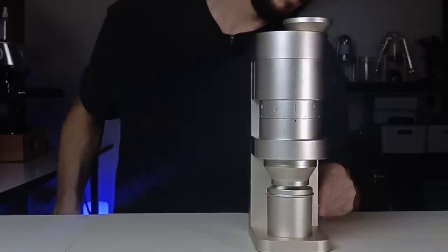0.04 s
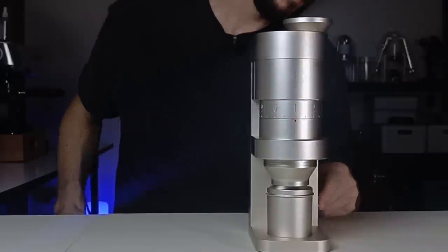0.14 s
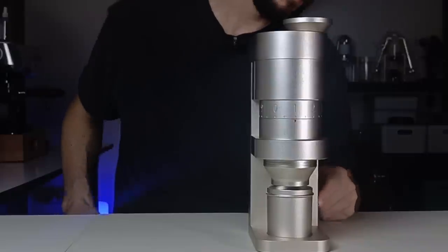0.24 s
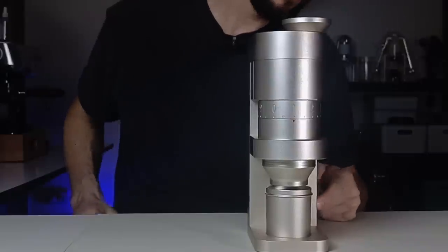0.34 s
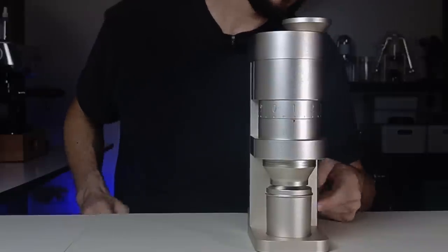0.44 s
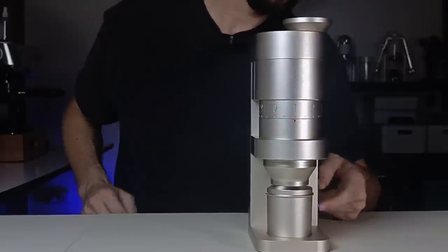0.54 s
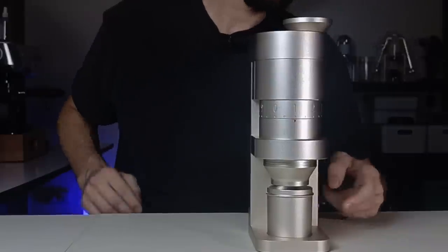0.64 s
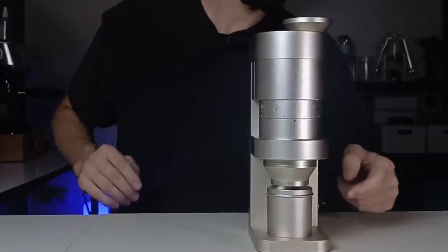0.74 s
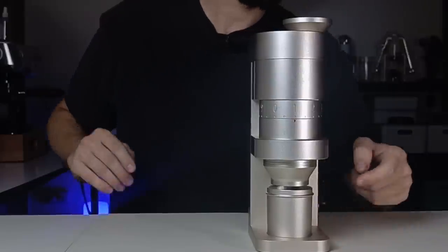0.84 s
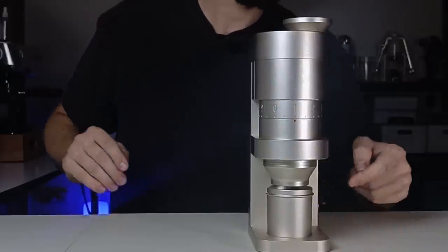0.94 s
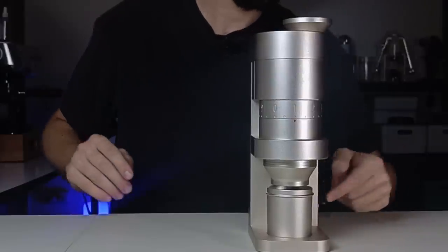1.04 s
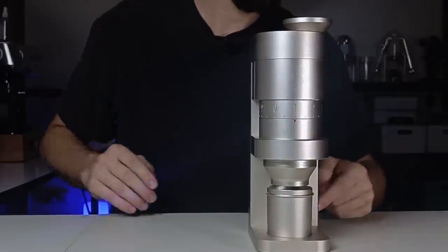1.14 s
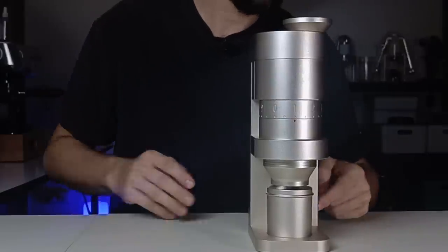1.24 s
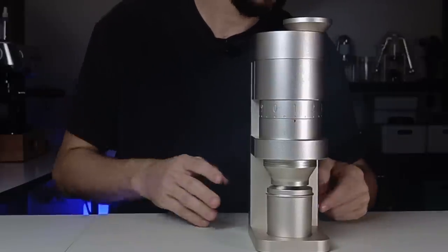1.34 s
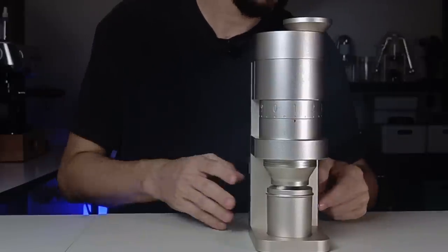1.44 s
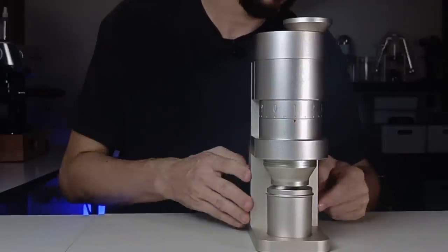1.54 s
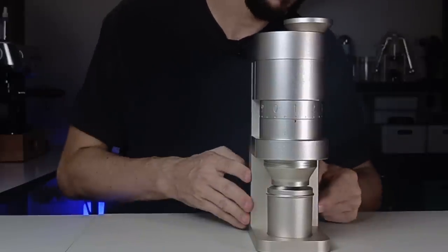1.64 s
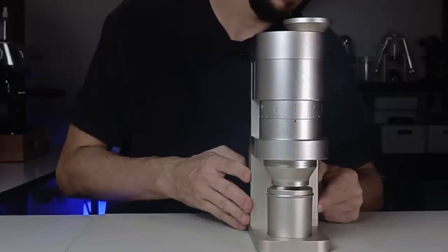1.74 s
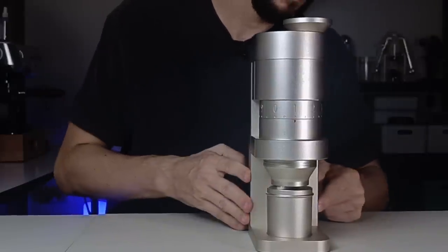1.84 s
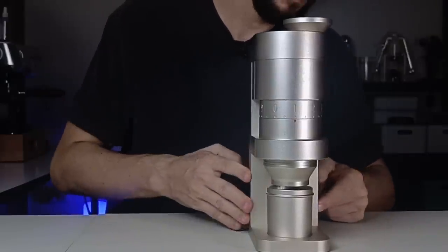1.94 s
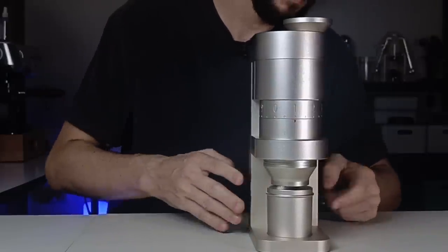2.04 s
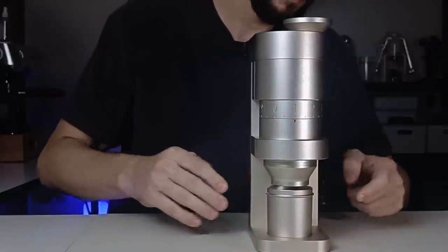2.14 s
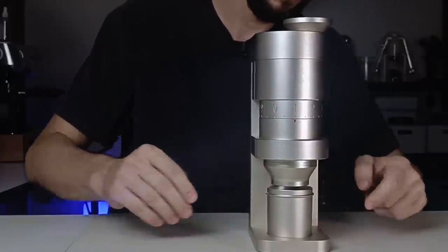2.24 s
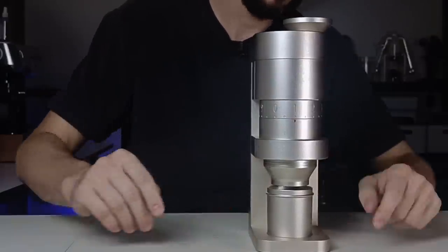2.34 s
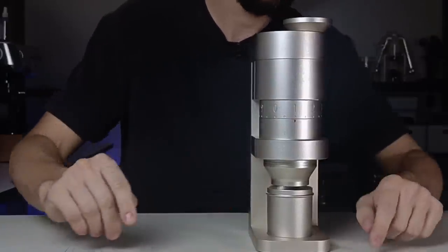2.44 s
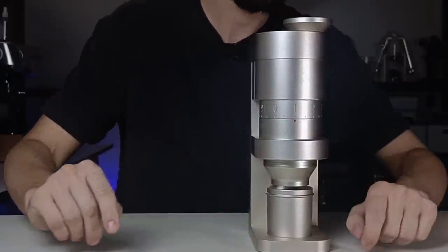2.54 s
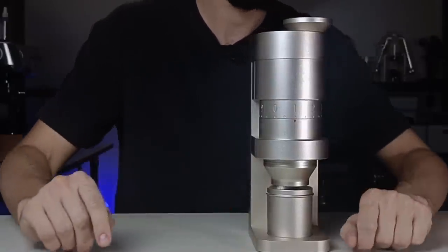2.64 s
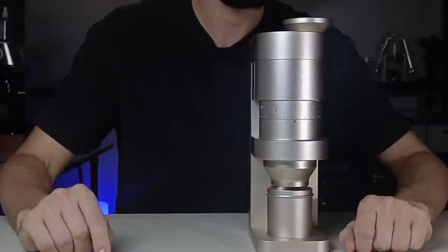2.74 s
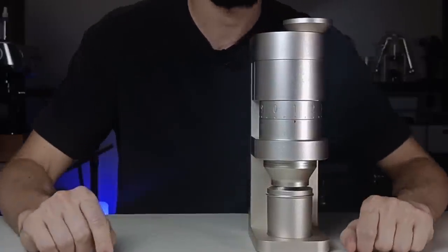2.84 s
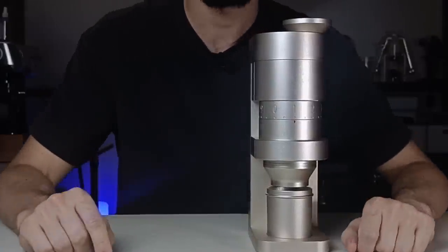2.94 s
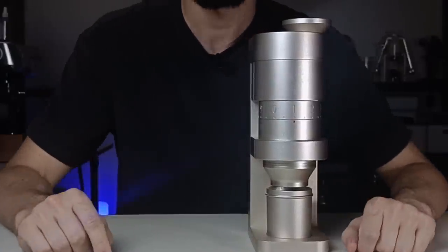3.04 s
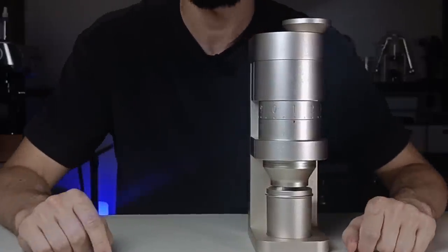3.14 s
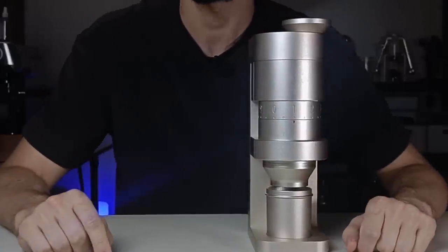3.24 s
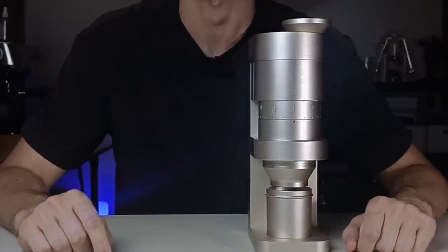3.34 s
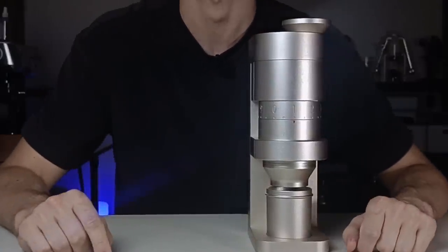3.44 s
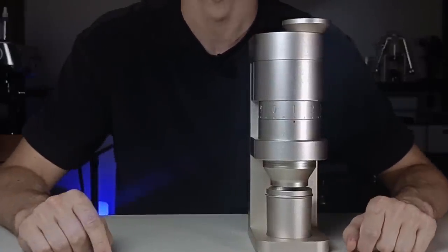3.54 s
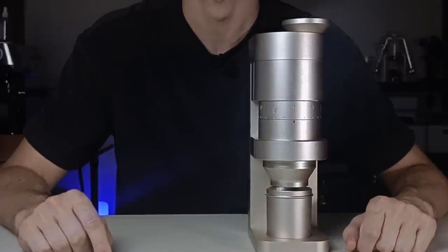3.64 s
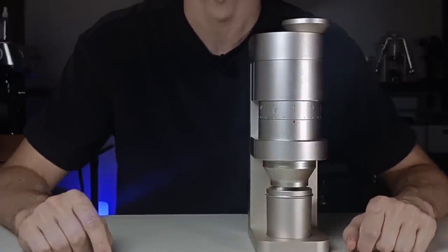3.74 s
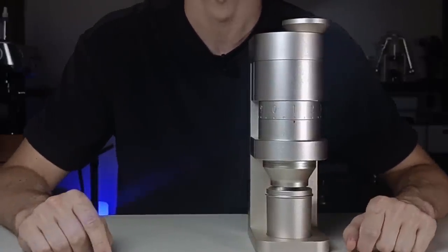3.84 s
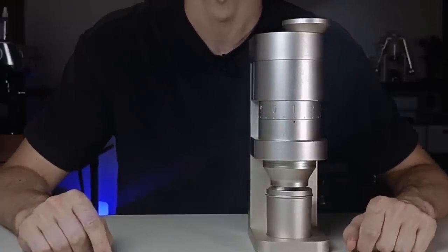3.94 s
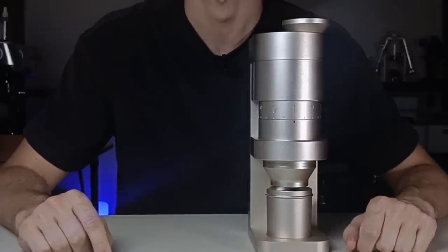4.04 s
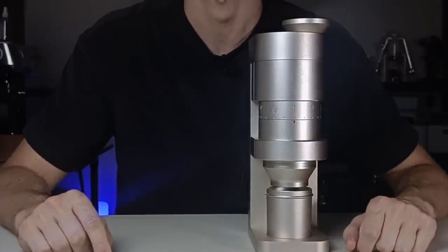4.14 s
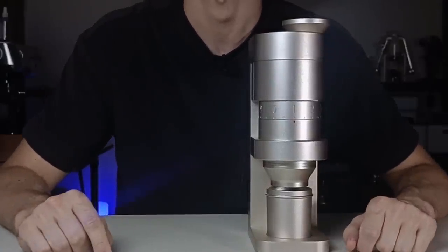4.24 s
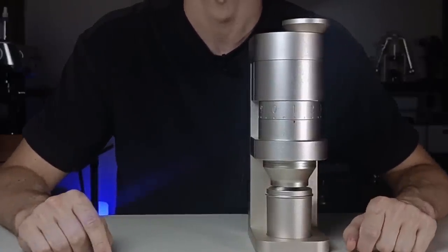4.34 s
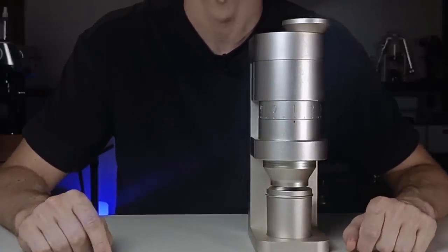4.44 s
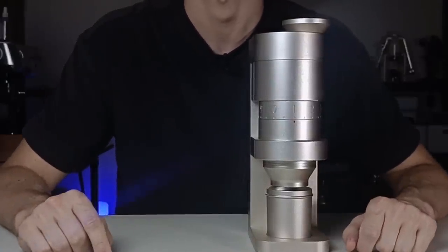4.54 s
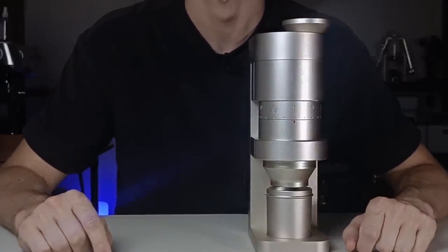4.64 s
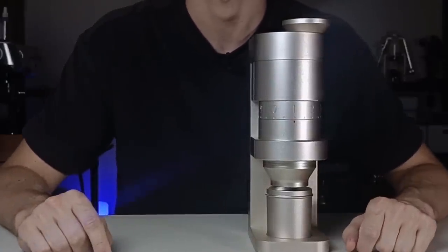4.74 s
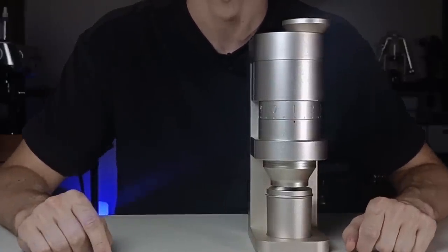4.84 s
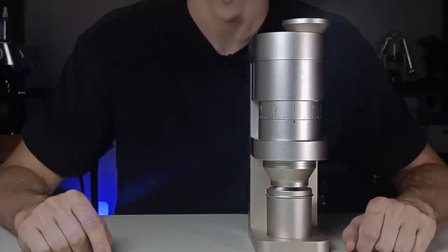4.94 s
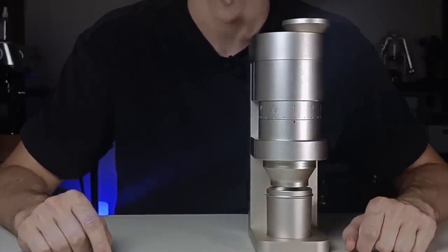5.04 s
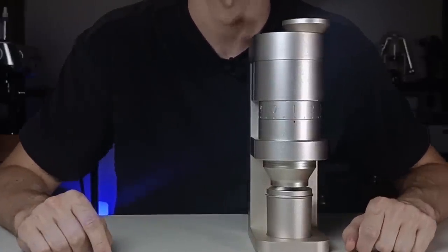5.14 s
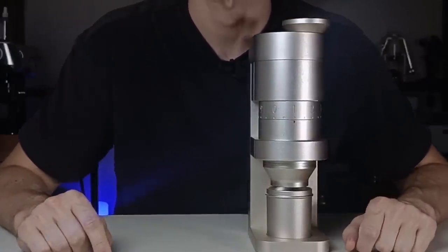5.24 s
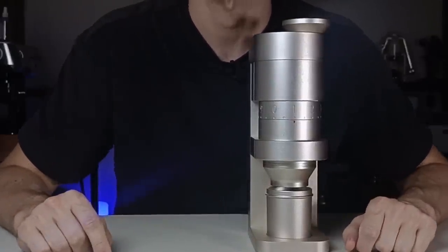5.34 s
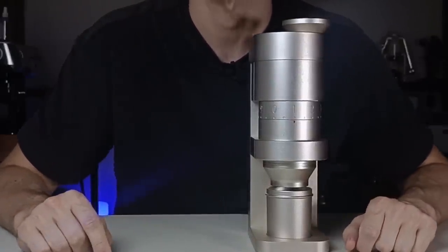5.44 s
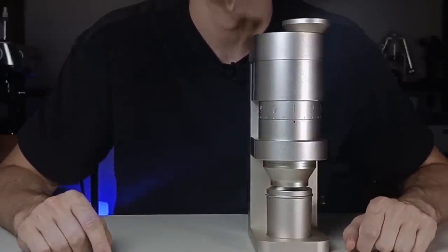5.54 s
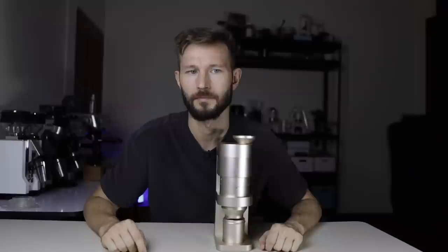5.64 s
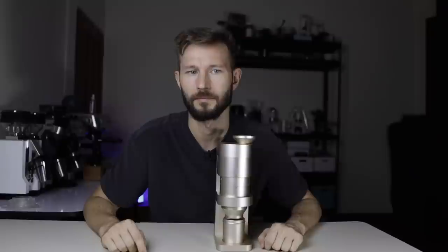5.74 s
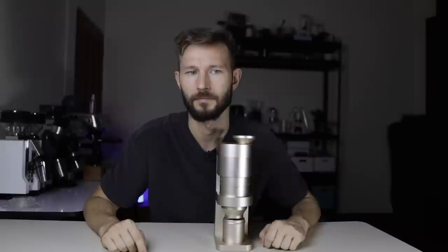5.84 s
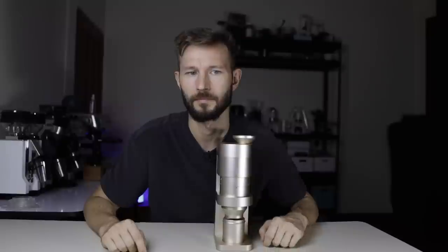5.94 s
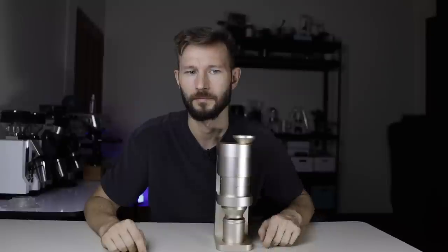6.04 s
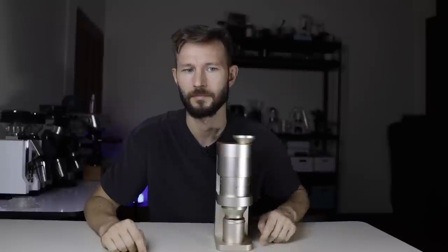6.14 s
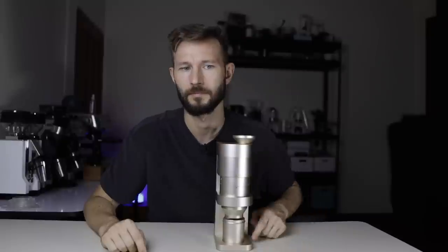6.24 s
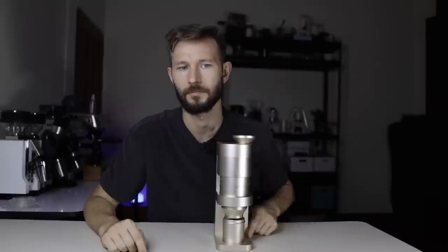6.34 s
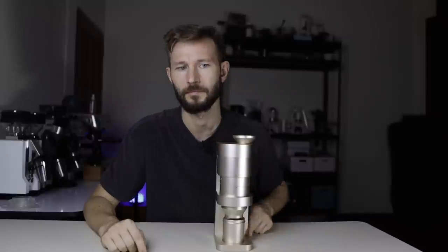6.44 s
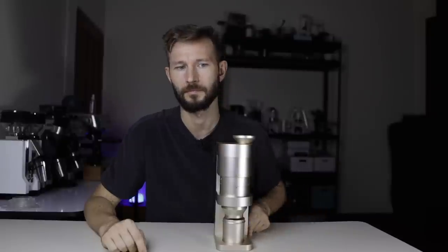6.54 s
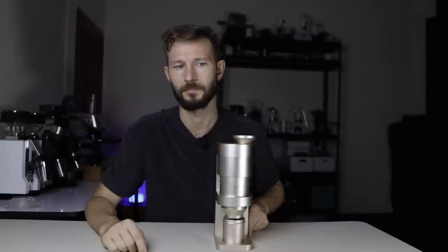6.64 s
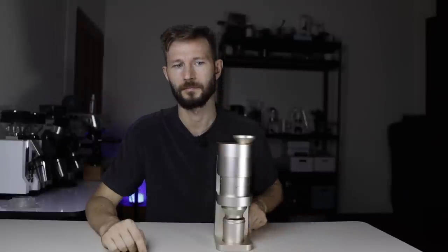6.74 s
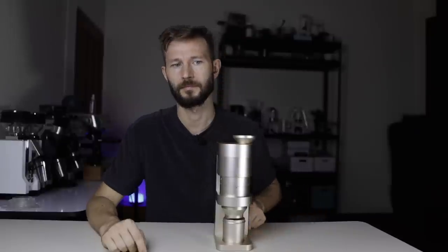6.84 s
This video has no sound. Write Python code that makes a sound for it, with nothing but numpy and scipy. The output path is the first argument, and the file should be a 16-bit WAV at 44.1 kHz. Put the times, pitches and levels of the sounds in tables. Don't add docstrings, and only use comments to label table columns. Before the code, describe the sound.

Electric coffee grinder starts with crunching beans, coasts down, restarts and rasps on steadily while an arm bumps the table and the beans run out.

```python
import sys
import numpy as np
from scipy import signal
from scipy.fft import rfft, irfft, next_fast_len
from scipy.io import wavfile
from scipy.ndimage import uniform_filter1d

SR = 44100
rng = np.random.default_rng(int(sys.argv[2]) if len(sys.argv) > 2 else 0)


def volts(x):
    e = np.asarray(x, float) / 20
    return 10 ** e


def wav_out(sig):
    wavfile.write(sys.argv[1], SR, np.round(np.clip(np.atleast_2d(sig).T, -1, 1) * 32767).astype(np.int16))


N = 304217
T = np.arange(N) / SR
SIZE = next_fast_len(N + SR)
HZ = np.maximum(np.arange(SIZE // 2 + 1) * SR / SIZE, 1)
GLIDE_HZ_PER_S = 400

# t/s, state (0 full, 1 high, 2 low, 3 empty, 4 burrs running free)
EMPTYING = [(0, 0.01), (1.55, 0.024), (1.68, 0.25), (1.95, 0.67), (2.6, 1.1), (3.0, 1.82), (3.4, 1.88),
            (4.7, 2.22), (5.0, 2.43), (5.26, 3.1), (5.34, 3), (6.25, 3.02), (6.45, 3.4), (6.58, 3.63),
            (6.9, 4.16)]
# t/s, tooth rate f/Hz, tooth contact level/dB
GEAR = [(.40, 500, -70), (.5, 1150, -55), (.62, 1560, -46), (.72, 1480, -36), (.8, 1370, -33),
        (.95, 1110, -32), (1.1, 875, -31), (1.2, 740, -32), (1.35, 560, -36), (1.55, 350, -60),
        (1.66, 250, -72), (1.755, 840, -34), (1.81, 1170, -33), (1.87, 1450, -34), (1.93, 1605, -36),
        (1.98, 1636, -37), (3.4, 1645, -41), (3.46, 1646, -47), (4.3, 1652, -48), (6.9, 1655, -60)]
# t/s, level/dB against steady running
BITE = [(.41, -13), (.44, -5), (.463, -7.5), (0.471, -1.5), (1.0, -0.5), (1.32, -4), (1.5, -11),
        (1.61, -17.5), (1.635, -23.5), (1.665, -14.5), (1.69, -10.5), (1.72, -4), (1.76, -3), (1.82, 0.5),
        (1.9, 1), (4.4, 1), (6.2, -0.5), (6.5, -3), (6.9, -4.5)]
# f/Hz, level/dB
FULL = [(200, -46.6), (330, -18.0), (600, -6.9), (1100, -9.3), (1400, -12.0), (2700, -10.9), (4700, -20.4),
        (5500, -22.4), (7600, -39.8), (9400, -33.2), (11300, -6.6), (13000, -60.0), (15800, -23.0)]
# f/Hz, width/Hz, level/dB
FULL_RINGS = [(590, 70, -4), (700, 90, -5), (834, 90, -2.5), (985, 100, -0.7), (1350, 70, -13.2),
              (1950, 102, -12.6), (2200, 78, -10.5), (2570, 150, -9.2), (2830, 139, -8.4),
              (3350, 122, -10.4), (3540, 112, -11.6), (4170, 75, -3.5), (4750, 899, -19.2),
              (6280, 90, -24.7), (6810, 127, -30.2), (8850, 899, -23.6), (9810, 346, -10.9),
              (10490, 899, -12.1), (11530, 195, -6.0), (11960, 431, -10.5), (12700, 668, -9.2),
              (13850, 899, -3.5), (14920, 899, -9.8)]


def rms_one(x):
    return x / np.sqrt(np.mean(x ** 2) + 1e-20)


def in_time(rows):
    s, *columns = np.transpose(rows)
    return [np.interp(T, s, c) for c in columns]


def ramp(start_s, length_s):
    return np.clip((T - start_s) / length_s, 0, 1)


def swell(s, middle_s, length_s):
    return 1 / (1 + (2 * (s - middle_s) / length_s) ** 6)


def at_hz(points, hz):
    point_hz, level_db = np.transpose(points)
    return np.interp(np.log(hz), np.log(point_hz), level_db)


def shaped(x, gain):
    return rms_one(irfft(rfft(x, SIZE) * gain, SIZE)[:N])


def drift(rate_hz):
    return shaped(rng.standard_normal(N), 1 / (1 + (HZ / rate_hz) ** 2))


def resonances(colour, rings):
    power = volts(at_hz(colour, HZ)) ** 2
    for hz, width_hz, level_db in rings:
        flank = 2.35 * (HZ - hz) / width_hz
        power = power + volts(level_db + 1) ** 2 / (1 + flank ** 2) ** 2
    return np.sqrt(power)


def fractures(per_s, spread_db):
    sizes = volts(spread_db * np.minimum(rng.exponential(1, N), 4)) * rng.choice([-1, 1], N)
    happens = rng.random(N) < per_s / SR
    return rms_one(sizes * happens) + 0.85 * rng.standard_normal(N)


def knocks(rows, colour, rise_s, octaves):
    out, t = np.zeros(N), np.arange(SR // 2) / SR
    hz = np.maximum(np.arange(len(t) // 2 + 1) * SR / len(t), 1)
    for s, peak_db, centre_hz, t60 in rows:
        white = rng.standard_normal(len(t))
        around = volts(at_hz(colour, hz)) / (1 + (np.log2(hz / centre_hz) / octaves) ** 4)
        burst = irfft(rfft(white) * around) * (1 - np.exp(-t / rise_s)) * volts(-60 * t / t60)
        i = round(s * SR)
        out[i:i + len(t)] += (volts(peak_db) * burst / abs(burst).max())[:N - i]
    return out


def room_air():
    # f/Hz, level/dB
    air_colour = [(12, -0.5), (24, -2.5), (44, -10), (98, -12.5), (800, -27), (1500, -37), (2300, -37.5),
                  (2900, -47), (3950, -47), (8000, -53), (12500, -39), (16000, -37)]
    return volts(-55.5) * shaped(rng.standard_normal(N), volts(at_hz(air_colour, HZ)))


def sleeve():
    # t/s, level/dB
    drag = [(4.1, -93), (4.15, -47), (4.4, -39), (4.66, -29.5), (4.73, -36.5), (4.76, -54), (4.83, -31.5),
            (4.87, -78)]
    level_db, = in_time(drag)
    slips = fractures(150, 4.7) * volts(2.0 * drift(25))
    dull = [(50, -30.5), (120, -3.0), (500, -2), (1100, -10.0), (2500, -53)]
    return volts(level_db) * shaped(slips, volts(at_hz(dull, HZ)))


def arm_bumps():
    # t/s, peak level/dB, centre f/Hz, fall by 60 dB/s
    bumps = [(1.72, -43, 24.4, .3), (2.79, -36, 36, 0.28), (4.132, -37.5, 600, .05),
             (4.168, -20.5, 426, 0.21), (4.25, -23, 250, 0.094), (4.29, -18.5, 800, .05),
             (4.37, -31, 193, 0.11), (4.398, -17, 680, 0.11), (4.465, -23.5, 225, 0.14),
             (4.50, -19, 597, 0.024), (4.575, -24.5, 138, 0.09), (4.645, -33, 200, 0.16),
             (4.705, -28, 350, 0.057), (4.812, -25, 500, 0.043)]
    return knocks(bumps, [(20, 2.4), (2000, 9.7)], rise_s=0.0064, octaves=0.92)


def table_thuds():
    # t/s, peak level/dB, centre f/Hz, fall by 60 dB/s
    thuds = [
        (4.62, -33.5, 73, 0.66),
        (6.0, -47, 67, 0.92),
        (4.85, -50, 36, .9),
    ]
    return knocks(thuds, [(20, 0), (2000, 0)], rise_s=0.03, octaves=0.1)


def switch_clicks():
    # t/s, peak level/dB, centre f/Hz, fall by 60 dB/s
    clicks = [(.3793, -35, 1610, 0.017), (.3915, -7, 9500, 0.018), (.394, -30.5, 1700, 0.083),
              (.402, -15, 13500, 0.03), (.4395, -19, 1010, 0.079), (.4665, -15, 13500, .02),
              (1.4788, -18, 12500, .01), (1.5055, -33, 12000, .01), (1.5165, -30, 10000, .01),
              (1.5257, -19, 10000, 0.018), (1.537, -31, 13000, 0.018), (1.5482, -25, 10000, .03),
              (1.5605, -31, 10000, .01), (1.5715, -31, 12000, .01), (1.5833, -13, 14500, 0.01),
              (1.5835, -25, 1000, 0.031), (1.588, -18, 11000, .02), (1.698, -24, 1000, 0.026),
              (1.631, -30, 11000, .03), (1.6477, -5, 10300, 0.018), (4.9627, -13, 12600, .008),
              (5.097, -11, 9000, .008), (6.3157, -9, 13900, .008), (6.388, -15, 13900, .008),
              (1.5835, -32, 5000, .02), (1.6465, -38, 3000, 0.023), (1.6758, -21, 9000, .02),
              (1.6982, -20, 8500, .025), (1.7217, -21, 7000, .02), (1.645, -32, 5200, .006),
              (.467, -18.5, 900, 0.071)]
    colour = [(300, 1.5), (2000, -6.5), (5500, -13.0), (7500, -19.5),
              (9800, 1), (10800, -6), (12000, -6.0), (16000, 3.0)]
    return knocks(clicks, colour, rise_s=0.00046, octaves=1.12)


def stray_pings():
    # t/s, peak level/dB, centre f/Hz, fall by 60 dB/s
    pings = [(5.408, -21, 4230, .05), (5.624, -27, 4350, .06), (5.766, -20, 4300, 0.084),
             (6.358, -24, 4300, 0.054), (6.522, -27, 4300, 0.029), (6.594, -35, 1386, .07),
             (6.631, -25, 4220, .04), (6.7665, -34, 3270, .06), (6.849, -34, 3290, .06)]
    return knocks(pings, [(20, 0), (2000, 0)], rise_s=0.0015, octaves=0.04)


def gear_levels(tooth_hz, contact_db):
    steady_db = [0, -6, -12, -25]
    rising_db = [0, -12, 0, -25]
    coasting_db = [-2, -9, -8, -11]
    radiates = [900, 800, 500, 780]
    # middle t/s, length/s, rise level/dB
    singing = [
        (2.08, .28, 11),
        (2.36, .22, 6),
        (2.73, .33, 10.5),
        (3.07, .3, 9),
        (3.245, .07, -8),
        (3.35, .12, 13),
        (3.92, .3, 3),
    ]
    # multiple, middle t/s, length/s, rise level/dB
    swells = [(1, .72, .1, 7), (1, .84, .08, 3), (1, 1.06, .07, 4), (2, .78, .2, 10), (2, .97, .05, 11),
              (2, 1.1, .2, 9), (3, .8, .08, 9), (3, .94, .04, 13), (3, 1.1, .05, 5), (3, 1.29, .13, 8),
              (4, .87, .06, 6), (4, 1.14, .05, 7), (4, 1.22, .06, 8), (1, 1.79, .04, 10),
              (1, 1.91, .08, -4), (2, 1.81, .04, 10), (3, 1.78, .075, 5), (3, 1.87, .04, 2),
              (3, 1.94, .12, -6), (3, 3.2, .55, 10)]
    low_loss_db = 39
    change = uniform_filter1d(np.clip(np.gradient(tooth_hz) * SR / GLIDE_HZ_PER_S, -1, 1), size=2000)
    rising, coasting = np.maximum(change, 0), np.maximum(-change, 0)
    levels_db = [contact_db + a + rising * (b - a) + coasting * (c - a)
                 for a, b, c in zip(steady_db, rising_db, coasting_db)]
    shell_db = 20 * np.log10(resonances(FULL, FULL_RINGS)) + 10
    for k, radiates_hz in enumerate(radiates):
        levels_db[k] -= low_loss_db * np.maximum(1 - tooth_hz / radiates_hz, 0)
        levels_db[k] += 0.5 * coasting * np.minimum(np.interp((k + 1) * tooth_hz, HZ, shell_db), 3)
    levels_db[0] -= low_loss_db * rising * np.maximum(1 - tooth_hz / 1000, 0)
    for multiple, middle_s, length_s, rise_db in [(1, *row) for row in singing] + swells:
        levels_db[multiple - 1] += rise_db * swell(T, middle_s, length_s)
    levels_db.append(-43 - 60 * (1 - coasting) - 6 * ((8 * tooth_hz - 5500) / 900) ** 2)
    hum_db = -10 + 3.5 * in_time(EMPTYING)[0] + 1.55 * in_time(BITE)[0]
    return levels_db, hum_db + abs(change) * (-13 - hum_db) - 2 * rising


def gear_whine(tooth_hz, levels_db):
    unevenness = [1.3, 1.7, 1.5, 2]
    gliding = np.clip(abs(np.gradient(tooth_hz)) * SR / GLIDE_HZ_PER_S, 0, 1)
    wobble = (.004 + .006 * gliding) * drift(20)
    phase = 2 * np.pi * np.cumsum(tooth_hz * (1 + wobble)) / SR
    whine = volts(levels_db[-1]) * np.sin(8 * phase)
    for k, waver_db in enumerate(unevenness):
        whine += volts(levels_db[k] + waver_db * drift(28)) * np.sin((k + 1) * phase)
    return whine


def table_hum(tooth_hz, hum_db, turning):
    # f/Hz, level/dB
    rumble_colour = [(20, -22), (60, 13), (115, -10), (200, 8.5), (300, -7.5), (420, -16.5)]
    # f/Hz, width/Hz, level/dB
    table_rings = [(114.1, 6.3, 19.3), (72.5, 5.4, 2), (36, 3.4, 2.2)]
    teeth_per_turn = 9.52
    turns = np.cumsum(tooth_hz / teeth_per_turn) / SR
    shake = volts(-44.5 + hum_db + 2.4 * drift(21.0)) * np.sin(2 * np.pi * turns)
    rumble_db = -48 + 6.2 * (tooth_hz / tooth_hz[-1] - 2.5) + 5.1 * drift(4.6)
    rumble = volts(rumble_db) * shaped(rng.standard_normal(N), volts(at_hz(rumble_colour, HZ)))
    stiff = [(20, -17), (140, 2), (170, -0.5), (2000, 12.0)]
    table = resonances(stiff, table_rings)
    return irfft(rfft(turning * (shake + rumble), SIZE) * table, SIZE)[:N]


def motor():
    tooth_hz, contact_db = in_time(GEAR)
    levels_db, hum_db = gear_levels(tooth_hz, contact_db)
    turning = ramp(.40, 0.03)
    return turning * (gear_whine(tooth_hz, levels_db) + table_hum(tooth_hz, hum_db, turning))


def colour_shift(hz, s):
    # f/Hz, level/dB
    slow = [(1100, -1), (1700, 4), (3900, -1), (4700, 4.5), (7000, 4), (12800, -2.5), (13800, -11),
            (15700, -1)]
    # f/Hz, width/Hz, level/dB, middle t/s, length/s
    zones = [(330, 260, 9.5, .54, 0.26), (400, 330, -3, 0.76, .25), (4170, 130, 1.5, 0.73, 0.28),
             (4230, 180, -4.5, 1.2, .6), (1650, 120, -5, 3.25, .08), (1590, 430, -1.5, 3.77, 0.42),
             (1500, 630, 3.5, 1.76, 0.27), (2300, 1300, 2.5, 0.88, 0.22), (960, 190, 4, 0.52, .2),
             (3490, 180, 5, 3.2, 0.87), (320, 73, 5, 3.85, 1.3), (6900, 1700, -2.5, .62, 0.42),
             (3920, 450, -3, 1.3, 0.3), (10400, 1600, 8, 1.734, .14), (12200, 430, -3, 1.74, .14),
             (4170, 260, -9, 1.75, 0.081), (6500, 3300, 6.5, 1.755, 0.11), (980, 260, 2.5, 1.3, 0.06),
             (11700, 750, -4, 2.88, .5), (13900, 770, 3, 2.8, 0.5), (8700, 2000, 4, 2.8, 0.5),
             (3750, 180, -3, 2.8, 0.33), (6200, 340, -8, 2.9, 0.44), (4730, 300, -2.5, 3.15, .45),
             (3880, 200, -5, 3.23, 0.3), (11000, 440, -8.5, 3.4, 1.9), (11760, 170, 0, 6.1, 0.9),
             (2800, 500, -3, 4.8, 0.62), (2440, 220, 3.5, 5.06, 0.64), (2040, 130, 8, 4.8, 0.8),
             (3350, 190, -11, 4.95, 0.45), (13800, 700, -2, 4.9, 0.77), (6660, 460, -5, 4.9, 0.86),
             (9300, 500, -4, 5.5, 0.85), (5530, 300, -4, 5.8, 0.55), (15600, 300, 6, 3.5, 7)]
    tooth_hz = np.interp(s, *np.transpose(GEAR)[:2])
    slowness = np.clip((1060 - tooth_hz) / 650, 0, 1)
    out = np.outer(at_hz(slow, np.maximum(hz, 1)), slowness)
    for centre_hz, width_hz, rise_db, middle_s, length_s in zones:
        zone = 1 / (1 + (2 * (hz - centre_hz) / width_hz) ** 4)
        out += rise_db * np.outer(zone, swell(s, middle_s, length_s))
    return out


def patchy(x, depth_db, lasting_s, wide_hz):
    hz, s, cells = signal.stft(x, SR, nperseg=1024)
    chance = rng.standard_normal(cells.shape)
    for size, axis in ((wide_hz / hz[1], 0), (lasting_s / s[1], 1)):
        chance = uniform_filter1d(chance, size=max(round(size), 1), axis=axis)
    change_db = depth_db * rms_one(chance) + colour_shift(hz, s) - 0.44
    return signal.istft(cells * volts(change_db), SR, nperseg=1024)[1][:N]


def part_levels(empty):
    # t/s, level/dB
    feeding = [(.425, -25), (0.441, -1.5), (.6, 6), (.7, 2), (1.0, 2), (1.3, -2), (1.61, 2), (2.1, -2),
               (2.45, 1), (2.7, 2.5), (3.45, -1), (4.0, -1), (4.4, -2.5), (4.85, -10), (6.9, -5)]
    # hopper boom, hopper crunch, body rasp, chute rasp, burr hiss, each level/dB
    part_db = [
        (-40.5, -27, -29, -30.5, -20),
        (-39.5, -27, -29, -32.5, -22.5),
        (-41.5, -29, -32, -29, -21.5),
        (-46.5, -34, -32.5, -24, -22.5),
        (-49.5, -37, -33, -24.5, -21),
    ]
    # share of the bite, share of the feed, drop after the last beans level/dB
    follows_bite = [2.2, 0.84, 0.91, 1.34, 1.39]
    follows_feed = [1, 0.86, 0.3, 0.2, 0.012]
    last_drop_db = [0.5, -4, -6, -2.5, 0]
    (bite_db,), (feed_db,) = in_time(BITE), in_time(feeding)
    passed = ramp(5.27, 0.059)
    levels_db = []
    for state_db, bite, feed, drop_db in zip(np.transpose(part_db), follows_bite, follows_feed, last_drop_db):
        level_db = np.interp(empty, range(5), state_db)
        levels_db.append(level_db + bite * bite_db + feed * feed_db + drop_db * passed)
    levels_db[3] += 1.5 * passed * np.clip(4.2 - empty, 0, 1) * drift(55)
    levels_db[3] -= 4 * ramp(6.2, 0.038)
    return levels_db


def grinding():
    edges_hz = [270, 520, 1250, 3200, 5400, 16200]
    # colours are f/Hz, level/dB; rings are f/Hz, width/Hz, level/dB
    high, high_rings = [(200, -51.7), (330, -16.6), (600, -6.1), (1100, -10.0), (1400, -14.5),
                        (2700, -10.0), (4700, -17.7), (5500, -25.8), (7600, -34.0), (9400, -60.0),
                        (11300, -9.1), (13000, -24.8), (15800, -16.2)], [(594, 70, -4), (680, 90, -4.5), (834, 80, -1.5), (990, 110, -1.5),
                                      (1080, 80, -5), (1640, 60, -9), (2770, 121, -9.3), (3290, 138, -7.5),
                                      (4140, 148, -10.9), (4870, 277, -10.9), (5970, 112, -16.7),
                                      (6560, 76, -27.1), (6820, 110, -28.0), (8810, 886, -21.5),
                                      (9860, 405, -7.5), (10500, 591, -10.7), (11110, 387, -5.6),
                                      (11490, 189, -2.3), (11980, 290, -6.8), (12640, 440, -10.7),
                                      (13030, 408, -13.3), (13950, 845, -1.6), (14910, 254, -11.6),
                                      (15290, 234, -9.0)]
    low, low_rings = [(200, -45), (330, -19), (600, -10.0), (1100, -21.5), (1400, -17.1), (2700, -20.1),
                      (4700, -11.0), (5500, -32.1), (7600, -41.5), (9400, -31.9), (11300, -28.9),
                      (13000, -12.3), (15800, -15.0)], [(590, 77, -13.7), (930, 436, -8.9), (1660, 73, -12.5),
                                    (2330, 203, -12.6), (2810, 110, -15), (3350, 129, -12.5),
                                    (3880, 320, -12.5), (4530, 100, -13.2), (6030, 109, -26.7),
                                    (6260, 118, -22.1), (6890, 899, -27.4), (8080, 110, -25.2),
                                    (8540, 899, -26.2), (9770, 356, -25.4), (10670, 575, -18.1),
                                    (11130, 159, -21.0), (11600, 309, -10.9), (12100, 340, -8.7),
                                    (12680, 349, -2.1), (13630, 301, -5.6), (14260, 169, -10.0),
                                    (14450, 101, -8.9), (14880, 295, -4.8), (15280, 269, -10.6)]
    bare, bare_rings = [(200, -40), (330, -29.1), (600, -22.4), (1100, -49.8), (1400, -29.3), (2700, -28.1),
                        (4700, -15), (5500, -35), (7600, -33.2), (9400, -21.1), (11300, -32.8),
                        (13000, -11.2), (15800, -13.4)], [(1120, 701, -18.2), (1700, 138, -20.2), (2370, 197, -14.6),
                                       (3070, 178, -14.1), (3510, 130, -9.5), (3950, 130, -9.5),
                                       (4300, 280, -1), (4620, 300, -8), (5080, 72, -16.5),
                                       (6280, 159, -18.6), (6700, 356, -21.6), (7150, 234, -22.3),
                                       (8110, 151, -21.5), (8570, 482, -22.8), (9800, 315, -18.6),
                                       (10230, 177, -18.4), (10470, 181, -17.9), (10760, 189, -12.4),
                                       (11550, 114, -3.0), (11880, 600, -7.0), (12620, 314, -2.3),
                                       (13580, 129, -3.3), (13930, 449, -1.0), (14830, 204, -5.8),
                                       (15410, 682, -7.2)]
    free, free_rings = [(200, -18.3), (330, -29.2), (600, -20.5), (1400, -17.5), (2700, -20.5),
                        (4700, -27.6), (5500, -23.7), (7600, -26.8), (9400, -17.5), (11300, -19.7),
                        (13000, -6.3), (15800, -9.5)], [(1370, 95, -14.2), (2090, 70, -15.1), (3280, 129, -12.1),
                                      (4140, 588, -5.4), (4600, 308, -8.2), (6260, 141, -18.4),
                                      (7070, 449, -20.1), (8830, 699, -17.0), (9820, 352, -14.1),
                                      (10210, 108, -9.5), (10750, 229, -8.4), (11110, 203, -6.1),
                                      (11510, 259, -5.5), (12020, 470, -4.9), (12620, 159, -1.8),
                                      (13920, 303, -1.8), (14920, 569, -2.7)]
    bodies = [resonances(FULL, FULL_RINGS), resonances(high, high_rings), resonances(low, low_rings),
              resonances(bare, bare_rings), resonances(free, free_rings)]
    empty, = in_time(EMPTYING)
    shares = [np.sqrt(np.clip(1 - abs(empty - k), 0, 1)) for k in range(5)]
    load_db = 0.058 * drift(2.7) + 0.37 * drift(38)
    cracks_per_s, flicker_db = [672, 909, 2500, 4000, 9000], [.8, 0.67, 0.12, 0.26, 0.61]
    out = 0
    for k, level_db in enumerate(part_levels(empty)):
        below, above = (edges_hz[k] / HZ) ** 24, (HZ / edges_hz[k + 1]) ** 24
        band = 1 / np.sqrt((1 + below) * (1 + above))
        cracks = [fractures(cracks_per_s[k], 2.5) for _ in range(2)]
        part = sum(shares[j] * shaped(cracks[j % 2], band * gain) for j, gain in enumerate(bodies))
        out = out + part * volts(level_db + load_db + flicker_db[k] * drift(8))
    out = patchy(out, depth_db=2.0, lasting_s=.22, wide_hz=60)
    return out * ramp(.396, 0.02)


def scene():
    arm = sleeve() + arm_bumps() + table_thuds()
    grinder = switch_clicks() + stray_pings() + motor() + grinding()
    return (room_air() + arm + grinder)[None]


def low_pass(x):
    return signal.sosfilt(signal.butter(12, 17100, fs=SR, output="sos"), x)


def record(dry):
    keep = np.clip((15775 - HZ) / 40 + .5, 0, 1)
    mix = irfft(rfft(dry, SIZE) * keep, SIZE)[:, :N]
    return low_pass(mix)


dry = scene()
out = record(dry)
wav_out(out)
```